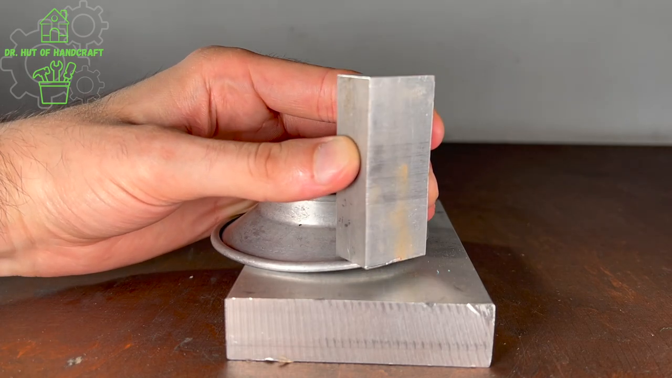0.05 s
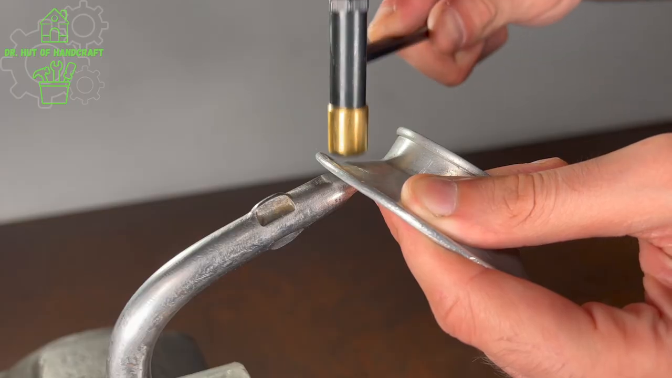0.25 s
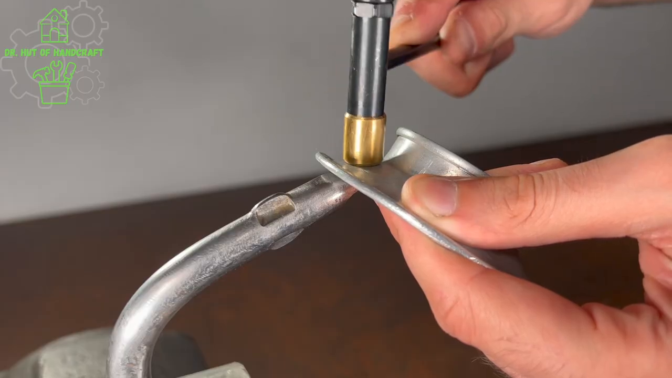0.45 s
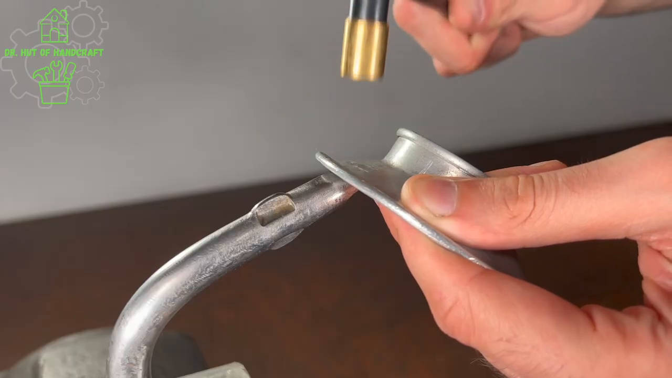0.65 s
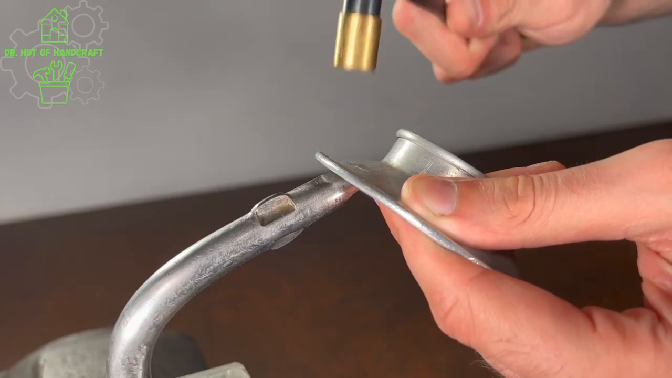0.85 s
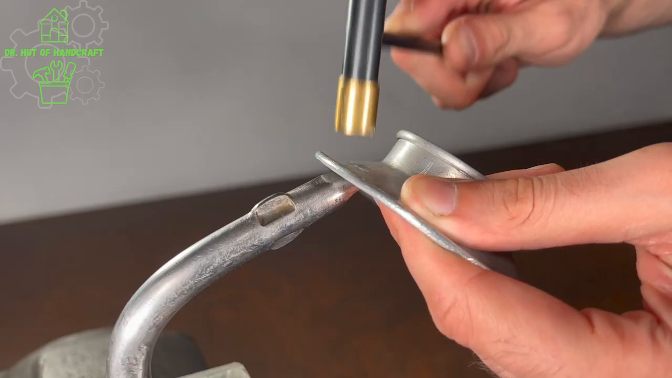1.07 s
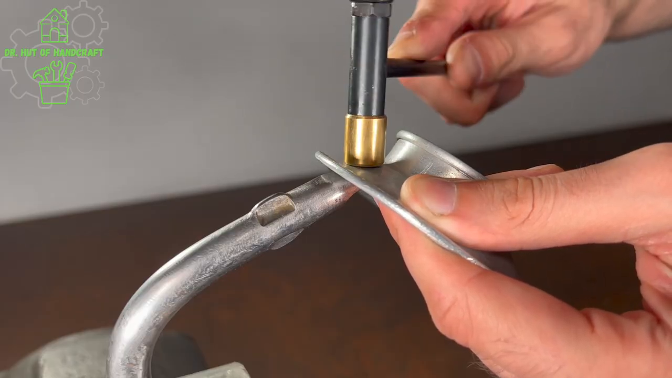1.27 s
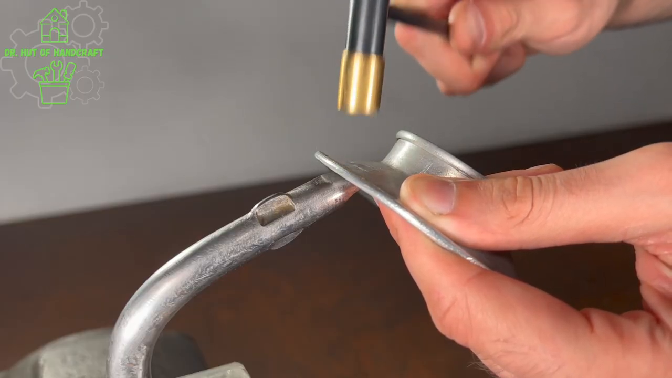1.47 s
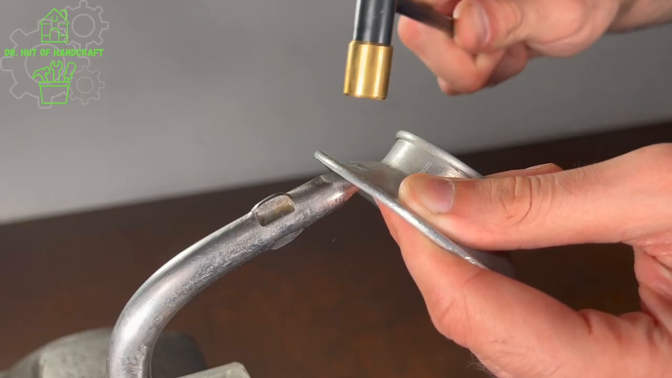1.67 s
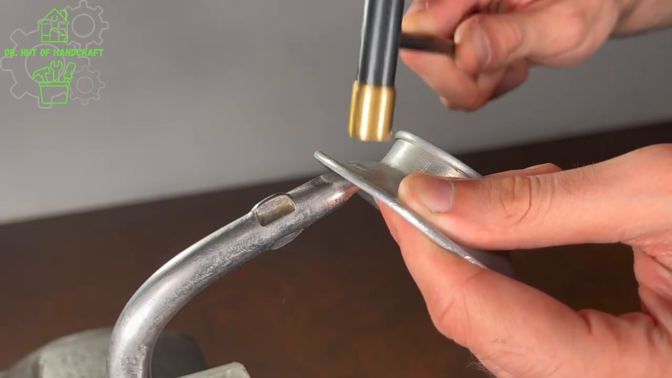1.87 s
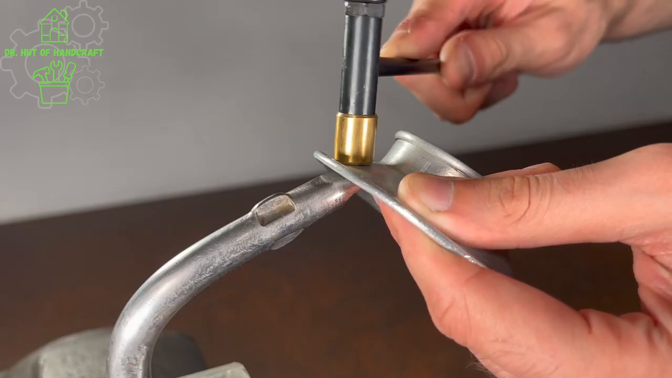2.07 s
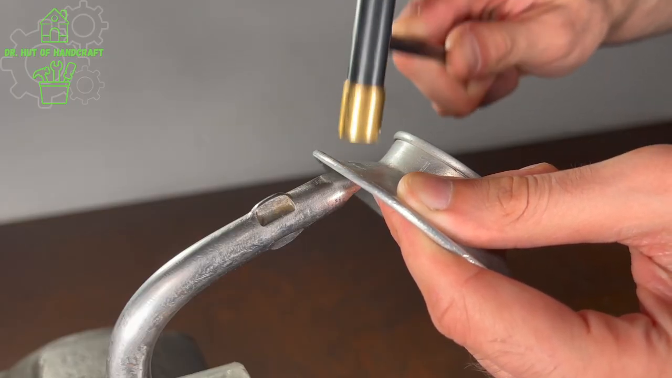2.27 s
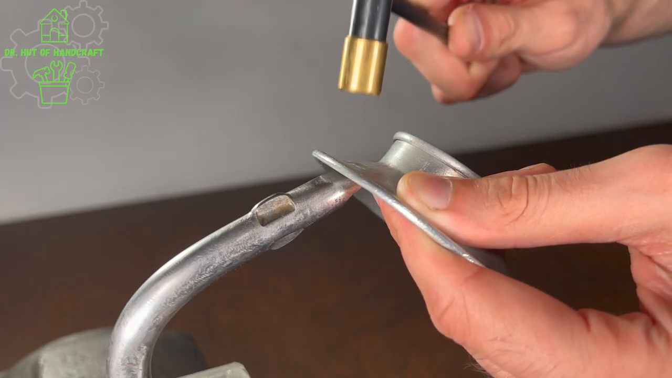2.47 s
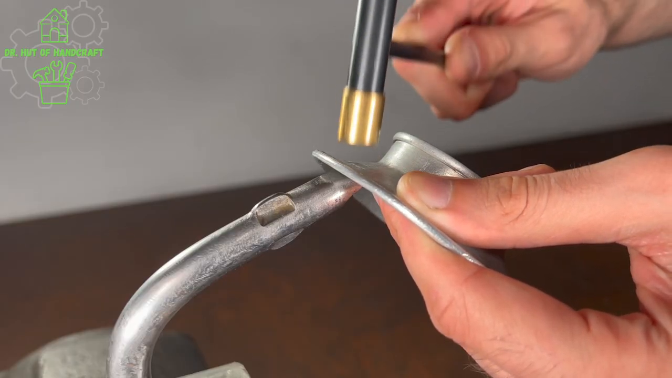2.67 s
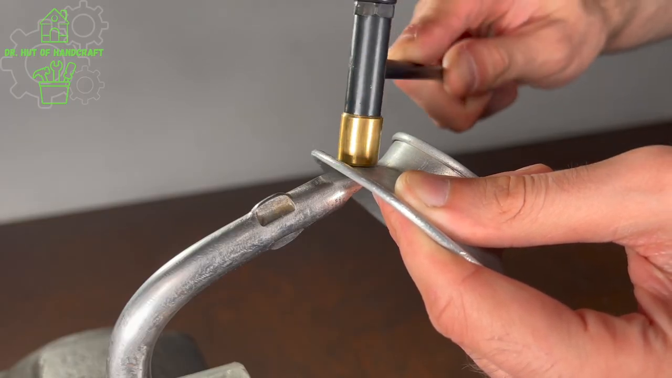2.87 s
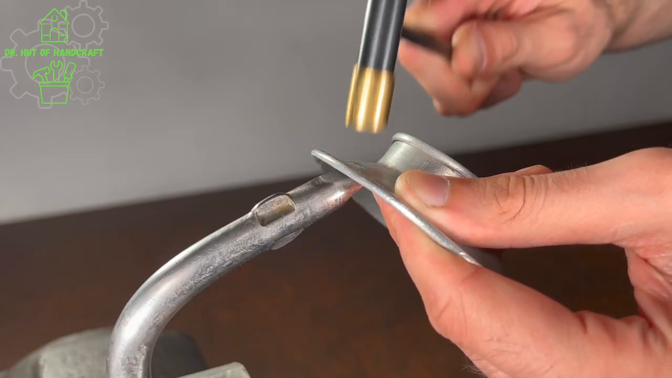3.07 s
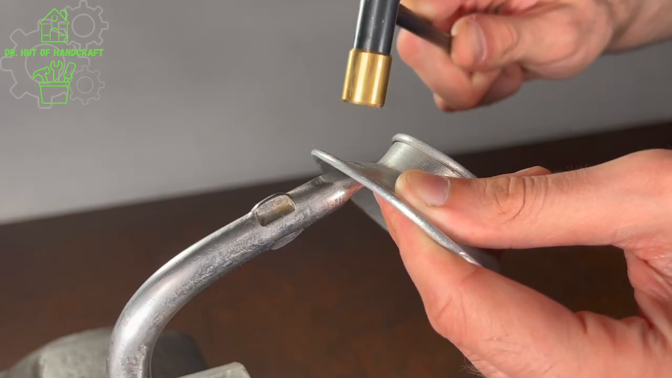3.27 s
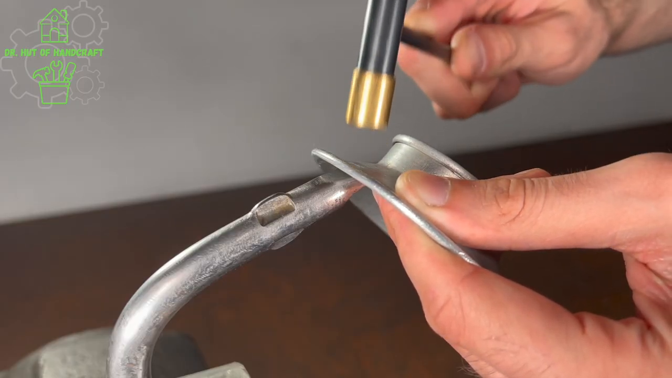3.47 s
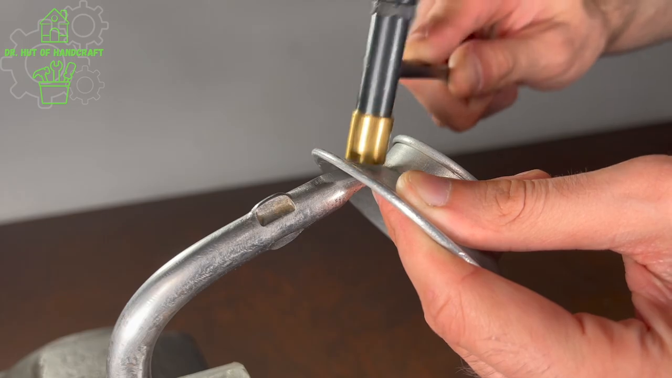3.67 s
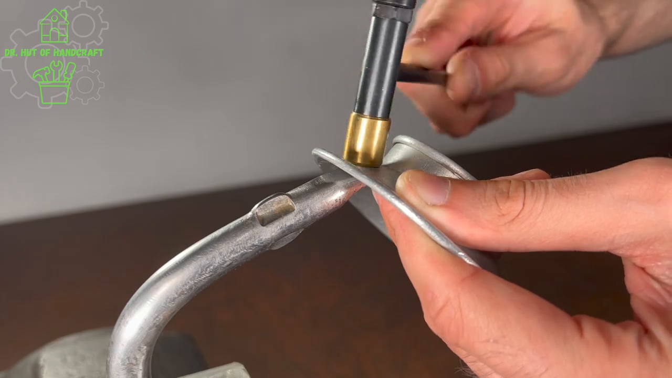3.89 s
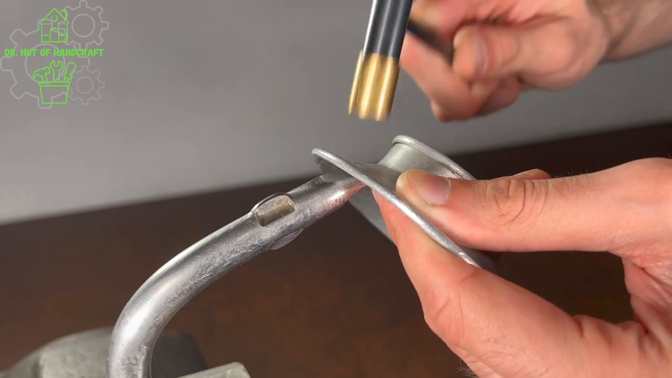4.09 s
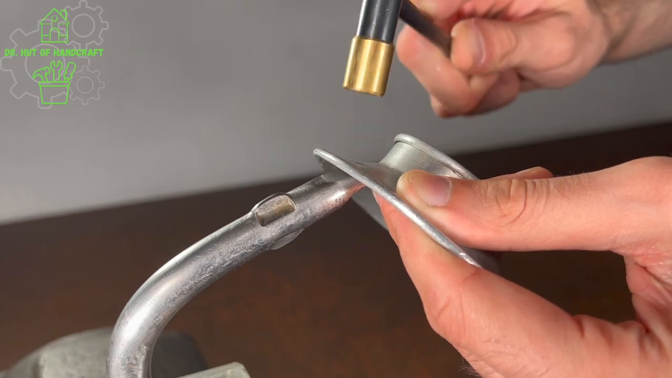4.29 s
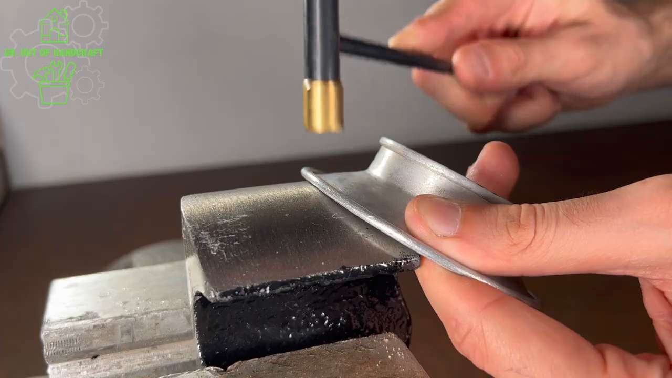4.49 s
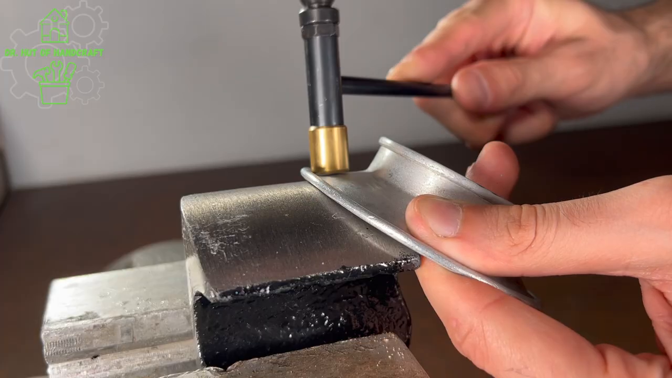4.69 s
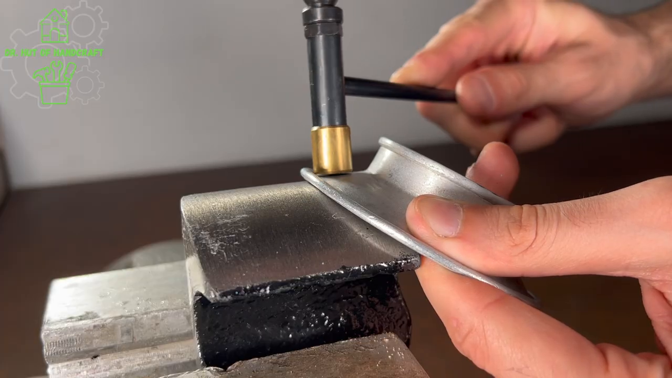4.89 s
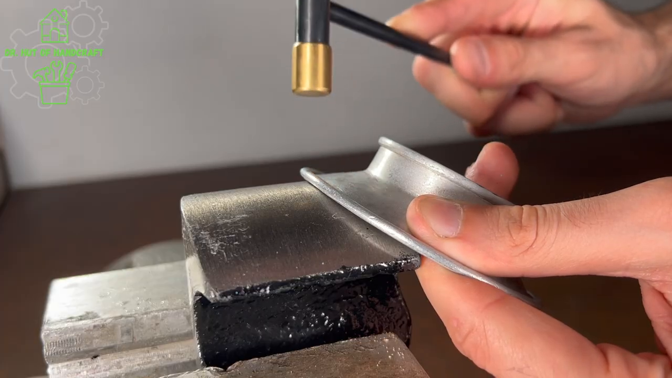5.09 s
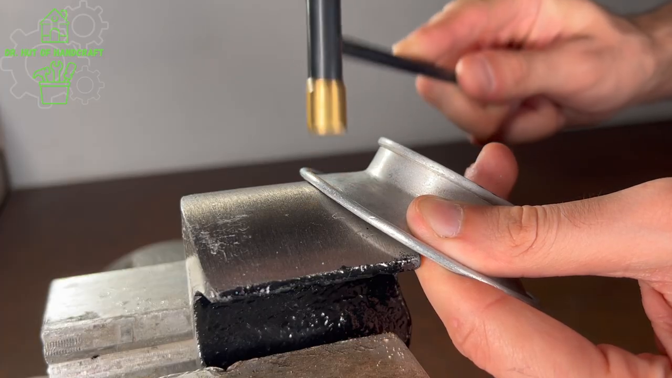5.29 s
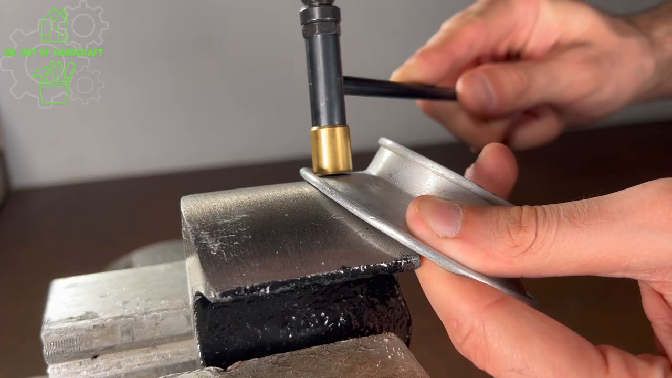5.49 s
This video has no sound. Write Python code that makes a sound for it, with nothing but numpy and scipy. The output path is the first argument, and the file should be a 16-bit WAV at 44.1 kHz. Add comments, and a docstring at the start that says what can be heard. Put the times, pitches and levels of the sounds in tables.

```python
"""Hammer taps on a metal dish

A small brass-faced hammer taps the rim of a sheet-metal dish in a quiet workshop, close to a two-port microphone.
First the dish lies over a bent steel bar, then, after a cut, over an angle iron in the vise.
Each blow is a crack of filtered noise, damped sine modes of the dish and bench, thin steel rings and
a clatter of fading noise bands. A low knock follows one blow, and soft noise makes the workshop hush."""
import sys
import numpy as np
from scipy import signal
from scipy.fft import rfft, irfft, next_fast_len
from scipy.io import wavfile

SR = 44100
rng = np.random.default_rng(int(sys.argv[2]) if len(sys.argv) > 2 else 0)


def master(y):
    """Save y as 16-bit WAV."""
    cut = np.clip(np.atleast_2d(y).T, -1, 1)
    pcm = np.round(cut * 32767)  # scale
    wavfile.write(sys.argv[1], SR, pcm.astype(np.int16))


N = 244314
T = np.arange(N) / SR
CUT_S, CUT_FADE_S = 4.44, 0.013   # when the support changes, and how long the cross-fade lasts


# moment and crack of each blow: (start_s, crack_db as rms over a millisecond)
STRIKES = [(0.1381, -21.5), (0.4001, -25.5), (0.6643, -22.5), (0.9353, -21), (1.1872, -22), (1.4634, -23),
           (1.7093, -19), (1.9787, -22), (2.2522, -21), (2.5317, -22.5), (2.7952, -21), (3.0575, -22),
           (3.3123, -22), (3.5658, -24), (3.8366, -23), (4.0803, -23), (4.3226, -22), (4.5741, -24.5),
           (4.8276, -23), (5.1215, -26), (5.3839, -22.5)]
# colour of brass on sheet: (pitch_hz, relative dB: spot_0_db, spot_1_db, iron_db)
CRACK_COLOUR = [(300, -47, -36, -30), (965, -17.5, -3, -13), (3000, -25, -23.5, -15),
                (3980, -15.5, -13, -30), (5100, -3, -5, -21.5), (7370, 10, -21.5, -9), (8000, -9, -8, -3.5),
                (8850, -4, -4, -7.5), (10330, -4, -8.5, -2), (11040, -16.5, 3.5, 3), (11800, 10, -12, -12),
                (13840, -4, 3.5, -15), (15000, -3.5, -0.5, -14), (15970, 0, -11.5, 3),
                (17000, -18.5, -27, -31)]
CRACK_T60_S = .0034
WALL_ECHO_S, WALL_ECHO_DB = .0125, -20


def crack():
    """Brass meets sheet: a very short bright noise, alike at both ports, coloured by the struck spot."""
    start_s, crack_db = np.transpose(STRIKES)
    random_signs = rng.choice([-1., 1.], N)
    frequencies = np.linspace(0, SR / 2, 129)
    out = np.zeros(N)
    # (share of this colour in each blow, support: 0 bar, 1 iron)
    colours = [(1 - spot(), 0), (spot(), 0), (np.ones(len(start_s)), 1)]
    for column, (share, support) in enumerate(colours, start=1):
        burst = dying(clicks(20 * np.log10(share + 1e-6))[support], CRACK_T60_S)
        # a smoothing filter softens the start of the burst
        burst = signal.lfilter([.05], [1, -1.6, .64], burst) * random_signs
        if support:
            burst = burst * (T > CUT_S)
        # doubled dB, because the minimum-phase step takes the square root of the gain
        gains = amp(2 * at_hz(CRACK_COLOUR, np.maximum(frequencies, 1), column))
        colour = signal.minimum_phase(signal.firwin2(255, frequencies, gains, fs=SR))
        out = out + signal.lfilter(colour, [1], burst)
    # bring each crack to its own level
    starts = np.round(start_s * SR).astype(int)
    energy = np.add.reduceat(out ** 2, starts)
    gain = amp(crack_db) / np.sqrt(energy / (SR / 1000))
    latest_blow = np.maximum(np.searchsorted(starts, np.arange(N), "right") - 1, 0)
    out = out * gain[latest_blow]
    # the nearest wall answers once
    return out + amp(WALL_ECHO_DB) * np.roll(out, round(WALL_ECHO_S * SR))


# hand-damped dish and bench over the bar, one pitch per row of BAR_MODES: pitch_hz
BAR_MODES_HZ = [88, 151, 250, 305, 425, 545, 732, 770, 1050, 1155, 1195, 1248, 1310, 1680, 1790, 2370, 2615,
                2710, 2985, 3100, 3270, 3525, 3785, 4540, 4790, 4980, 5300, 5585, 7230, 8400]
# how those modes sound, levels relative to the blow: (t60_s, spot_0_db, spot_1_db)
BAR_MODES = [(0.55, 19, -3), (0.91, -12.5, -6), (.2, -1.5, -7.5), (0.17, 3.5, 1.5), (.25, -19.5, -9),
             (0.16, -16, -3), (0.2, -2.5, -8.5), (0.086, -4.5, -16.5), (0.38, -5.5, -23), (0.1, 6.5, -13.5),
             (0.14, 13, -9), (0.076, 8.5, -10.5), (0.032, -12, -9.5), (0.027, 6.5, -1), (0.019, -9.5, 2.5),
             (0.08, -11, -7), (0.053, 3, -3.5), (0.023, 6.5, -2.5), (0.035, 15, -4), (0.013, -2.5, 11.5),
             (.05, -3.5, -6), (0.15, -2.5, -16), (0.089, 19.5, -13.5), (0.17, -11, -4), (0.089, -12, 6.5),
             (.07, -8, -0.5), (0.12, -11, 1.5), (0.045, -5, -5), (0.035, 7.5, -3), (0.042, -6, -10.5)]
# the dish and bench over the angle iron, levels relative to the blow: (pitch_hz, t60_s, level_db)
IRON_MODES = [(87.2, 0.85, -8.5), (253.5, 0.35, -1), (313.8, 0.2, 0), (1180, 0.21, -6.5), (2310, 0.18, -14),
              (3740, 0.019, -4), (8480, 0.011, 1)]
# how slowly a mode swells: (pitch_hz, swell_s)
SWELL = [(90, 0.0067), (300, 0.0035), (700, 0.0065), (1200, 0.0038), (1700, 0.0015), (8000, 0.00032)]
SHEET_DB = -2   # added to every mode level


def dish():
    """Each blow sets off the damped modes of the dish and bench, with chance strengths and wall echoes."""
    modes = np.zeros((2, 2, N))   # support, port, time
    for hz, (t60, near_db, far_db) in zip(BAR_MODES_HZ, BAR_MODES):
        level_db = near_db + (far_db - near_db) * spot()
        chance_db = rng.normal(0, 1.5, len(BLOWS))
        hits = clicks(blow_db(hz) + level_db + SHEET_DB + chance_db)[0]
        modes[0] += ring(hits, hz, t60, at_hz(SWELL, hz))
    for hz, t60, level_db in IRON_MODES:
        chance_db = rng.normal(0, 1.5, len(BLOWS))
        hits = clicks(blow_db(hz) + level_db + SHEET_DB + chance_db)[1]
        modes[1] += ring(hits, hz, t60, at_hz(SWELL, hz))
    return cut(shop(modes))


# long thin rings of the steel, one pitch per row of STEEL: pitch_hz
STEEL_HZ = [941.3, 1093, 1221, 1592, 1126, 1583]
# how they sound, levels relative to the blow's ring level:
# (t60_s, spot_0_db, spot_1_db, support: 0 bar 1 iron, ring: 0 low 1 high)
STEEL = [(0.47, -4.5, -3.5, 0, 0), (0.4, -1, -12, 0, 0), (.4, -14, -20, 0, 0), (0.54, 1.2, -0.6, 0, 1),
         (0.58, -6, -6, 1, 0), (0.34, 5.5, 3, 1, 1)]
STEEL_SWELL_S = 0.013


def steel():
    """The steel under the dish rings in a few long, thin modes."""
    rings = np.zeros((2, 2, N))   # support, port, time
    for hz, (t60, near_db, far_db, support, which_ring) in zip(STEEL_HZ, STEEL):
        blow_ring_db = np.array(BLOWS)[:, 3 + int(which_ring)]
        level_db = blow_ring_db + near_db + (far_db - near_db) * spot()
        rings[int(support)] += ring(clicks(level_db)[int(support)], hz, t60, STEEL_SWELL_S)
    return cut(rings)


# clatter over the bar, levels relative to the blow and late level relative to the first:
# (pitch_hz, level_db, rise_s, first_t60_s, late_db, late_t60_s)
CLATTER = [(39.8, -15, .012, 0.4, -15, 1), (78.5, -3, 0.0045, 0.57, -9, 0.54),
           (182, -12.5, 0.0039, 0.59, -21, 0.59), (372, -3.5, 0.012, 0.17, -19, 0.69),
           (1000, -5, 0.0011, 0.27, -14, 0.21), (2000, -8.5, 0.0038, 0.067, -7, 0.37),
           (3100, 5, 0.00067, 0.087, -14.5, 0.32), (4050, 7.5, 0.00055, 0.029, -25, 0.41),
           (5040, 2.5, 0.0014, 0.11, -8, 0.35), (7200, -9.5, .001, 0.097, -7, 0.38),
           (7985, -8.5, .001, 0.07, 0.5, 0.32), (10000, -11.5, .001, 0.067, -33.5, .25),
           (11600, -6.5, 0.0013, 0.025, -15.5, 0.29), (14400, -10.5, 0.0011, 0.029, -14.5, 0.24)]
# changes over the iron: (pitch_hz, first_db, first_decay_stretch as a factor, late_db)
IRON_CLATTER = [(60, -12, 0.85, 5.5), (164, 6, 0.58, 7), (330, 3, 0.89, -10), (700, 0, 0.84, 2.5),
                (1320, 5, 0.94, -14), (2290, -12, 2.5, 4.5), (2960, -35, 2.1, -8), (3595, -15, 4.4, 2.5),
                (5930, -20, 0.39, 7.5), (7600, -13, 0.45, 2), (12200, 8, 0.12, -3.5)]
ECHO_BUILD_S = 0.0016


def clatter():
    """Countless damped sheet modes and wall echoes, made as noise that dies away band by band."""
    out = np.zeros((2, 2, N))   # support, port, time
    for hz, noise in bands():
        level_db, rise, first_t60, late_db, late_t60 = (at_hz(CLATTER, hz, k) for k in range(1, 6))
        iron_db, stretch, iron_late_db = (at_hz(IRON_CLATTER, hz, k) for k in range(1, 4))
        chance_db = rng.normal(0, 1.0, len(BLOWS))
        hits = clicks(blow_db(hz) + level_db + chance_db)
        on_bar = dying(hits[0], first_t60)
        on_iron = amp(iron_db) * dying(hits[1], first_t60 * stretch)
        echoes = amp(late_db + np.array([[0], [iron_late_db]])) * dying(hits, late_t60)
        # echoes gather after the blow, then the whole band gets its own rise
        shape = build_up(np.array([on_bar, on_iron]) + build_up(echoes, ECHO_BUILD_S), rise)
        out += shape[:, None] * noise * np.sqrt(SR / 2 / hz)   # alike power in every octave
    return cut([valleys(out[0]), out[1]])


# gaps between the dish's mode clusters, and its strongest clusters: (pitch_hz, width_hz, level_db)
VALLEYS = [(201, 110, -5), (465, 350, -6.5), (654.3, 80, -1), (840, 140, -9.5), (1067, 180, -7.5),
           (1453, 130, -14.5), (2250, 510, -2), (2730, 98, 6.5), (2760, 100, -9.5), (2980, 39, 4.5),
           (3290, 54, -6), (3780, 63, 3), (4087, 410, -4.5), (4310, 68, 1.5), (4610, 77, 6.5),
           (5278, 120, 7.5), (5255, 120, -5.5)]


def valleys(x):
    """A chain of filters cuts the gaps and lifts the strong clusters."""
    for hz, width, level_db in VALLEYS:
        w, a = 2 * np.pi * hz / SR, np.pi * abs(width) / SR
        a_gain = a * amp(level_db)
        x = signal.lfilter([1 + a_gain, -2 * np.cos(w), 1 - a_gain], [1 + a, -2 * np.cos(w), 1 - a], x)
    return x


KNOCK_S, KNOCK_DB, KNOCK_HZ, KNOCK_T60_S = 5.133, -29.5, 77.1, 0.07


def knock():
    """A single low push: a sine that falls by 60 dB in 0.07 s."""
    t = np.maximum(T - KNOCK_S, 0)
    return -amp(KNOCK_DB - 60 * t / KNOCK_T60_S) * np.sin(2 * np.pi * KNOCK_HZ * t)


# colour of the workshop air, levelled as a whole below: (pitch_hz, relative level_db per Hz)
HUSH = [(15, -32), (25, -21.5), (84, -4.5), (124, -28.5), (218, -28), (826, -39), (1080, -26.5),
        (2560, -34), (3200, -39.5), (3990, -34.5), (9000, -42), (11700, -66.5), (19800, -120)]
# level changes of the hush over time: (start_s, bass_db, treble_db)
HUSH_FADE = [(0, 21.5, 4), (0.083, -6.5, -3), (.11, -8, -12), (0.134, -1.5, -7.5), (4.398, -6, -8.5),
             (4.5, -1.5, -11), (5.54, -9.5, -5)]
HUSH_DB = -66.5   # rms before the level changes
HUSH_SPLIT_HZ = 400   # bass below, treble above


def hush():
    """The air of the shop: soft noise whose bass and treble change level separately."""
    parts = np.zeros((2, 2, N))   # bass or treble, port, time
    for hz, noise in bands():
        parts[int(hz > HUSH_SPLIT_HZ)] += amp(at_hz(HUSH, hz)) * noise
    start_s, bass_db, treble_db = np.transpose(HUSH_FADE)
    bass = parts[0] * amp(np.interp(T, start_s, bass_db))
    treble = parts[1] * amp(np.interp(T, start_s, treble_db))
    rms = np.sqrt(np.mean(parts.sum(axis=0) ** 2))
    return (bass + treble) * amp(HUSH_DB) / rms


# what each blow sets going, one row per strike:
# (struck spot on the rim 0-1, strength_db, dish_clang_db, steel_low_ring_db, steel_high_ring_db)
BLOWS = [(.25, -1.5, 6.5, -34, -55), (.36, -2, -2.5, -36, -48.5), (.46, 1, 2.5, -34, -46),
         (.56, -0.5, 6.5, -35.5, -45), (.65, -2, 6, -36, -43), (.85, 3, -3.5, -35.5, -51),
         (.75, -1, -6, -39, -50.5), (.76, -3, 4, -35.5, -42), (.81, -2, 0.5, -41.5, -48),
         (.89, -1, -3, -40.5, -51), (.91, -0.5, -7, -48.5, -64), (.92, 1.5, -3, -45, -53),
         (.94, 5, -4, -46, -52), (.95, -1.5, -1, -43, -52), (.97, -1.5, -4.5, -46, -52),
         (.95, 2, -3, -41.5, -48.5), (.98, 2.5, -0.5, -62, -61.5), (1, -0.5, 0, -52, -56.5),
         (1, -1.5, 1, -52.5, -57.5), (1, 3, 4, -52.5, -54.5), (1, -3, 4.5, -57, -54)]


def spot():
    """Where on the rim each blow lands, as the dish is turned."""
    return np.clip(np.array(BLOWS)[:, 0], 0, 1)


# colour of a blow: (pitch_hz, bar_db, iron_db, then dB added per dB of: strength, clang, steel ring)
BLOW_COLOUR = [(90, -54.5, -44.5, 0.77, 0.1, 0.01), (364, -35.5, -46.5, 0.22, 0.0063, 0.01),
               (1200, -31, -37.5, 0.2, 0.19, 0.74), (3080, -38.5, -41.5, 0.01, 1.2, 0.01),
               (5000, -44.5, -47.5, 1.01, 0.16, 0.01), (7130, -39.5, -35, 0.34, 0.49, 0.01),
               (13000, -21.5, -14, 0.62, 0.68, 0.05)]
USUAL_RING_DB = -47   # ring level that leaves the colour as it is


def blow_db(hz):
    """Level of every blow at one frequency: the support's colour, moved by strength, clang and ring."""
    _, strength_db, clang_db, low_db, high_db = np.transpose(BLOWS)
    bar_db, iron_db, by_strength, by_clang, by_ring = (at_hz(BLOW_COLOUR, hz, k) for k in range(1, 6))
    ring_db = (low_db + high_db) / 2 - USUAL_RING_DB
    support_db = np.where(np.array(STRIKES)[:, 0] > CUT_S, iron_db, bar_db)
    return support_db + by_strength * strength_db + by_clang * clang_db + by_ring * ring_db


EARLIER_BLOW_S = 4.288


def clicks(db):
    """One click per blow: row 0 on the bar, row 1 on the iron, where an earlier blow still sounds at the cut."""
    start_s = np.array(STRIKES)[:, 0]
    on_iron = start_s > CUT_S
    out = np.full((2, N), 1e-18)
    out[on_iron.astype(int), np.round(start_s * SR).astype(int)] = amp(db)
    out[1, round(EARLIER_BLOW_S * SR)] = amp(db[np.argmax(on_iron)])   # as strong as the first iron blow
    return out


def cut(pair):
    """Cross-fades from the bar to the iron."""
    fade = np.clip((T - CUT_S) / CUT_FADE_S + .5, 0, 1)
    return (1 - fade) * pair[0] + fade * pair[1]


def ring(hits, hz, t60, swell_s):
    """A mode swells and dies as a spinning resonance; the ports hear it at different phases."""
    spin = np.exp(2j * np.pi * hz / SR)
    soft = np.exp(-1 / (abs(swell_s) * SR))
    poles = np.convolve([1, -soft * spin], [1, -amp(-60 / (t60 * SR)) * spin])
    turning = signal.lfilter([1 - soft], poles, hits)
    phase_apart = np.arccos(np.clip(at_hz(LIKENESS, hz), -1, 1)) / 2 * np.array([[1], [-1]])
    return np.imag(turning * np.exp(1j * phase_apart)) * port_gains(hz)


SHOP_T60_S, SHOP_DB, SHOP_GAP_S = 0.46, -15, 0.0022   # decay, echo level, wait before the echoes


def shop(x):
    """Dense wall echoes, other ones at each port, smear every ring into a rough tail."""
    t = np.arange(round(SHOP_T60_S * SR)) / SR
    echoes = rng.standard_normal((2, len(t))) * amp(-60 * t / SHOP_T60_S) * (t > SHOP_GAP_S)
    # little bass in the echoes, so the bass stays alike at both ports
    echoes = signal.sosfilt(signal.butter(2, 400, "high", fs=SR, output="sos"), echoes)
    echoes = echoes / np.sqrt(np.sum(echoes ** 2, axis=1, keepdims=True))
    return x + amp(SHOP_DB) * signal.fftconvolve(x, echoes[None], axes=2)[..., :N]


# how alike the two ports are: (pitch_hz, likeness, limited to -1 to 1 in use)
LIKENESS = [(60, 1), (130, 0.91), (290, 0.88), (640, -0.057), (1400, -1.134), (3100, -0.11), (5500, -0.12),
            (7200, 0.98), (15000, 0.97)]


def bands():
    """Stereo noise in quarter-octave bands from 30 Hz, each with its likeness and lean."""
    edges = 30 * 2 ** (np.arange(37) / 4)
    white = rng.standard_normal((2, 2, N))
    for k, (low, high) in enumerate(zip(edges, edges[1:])):
        hz = np.sqrt(low * high)
        band = signal.butter(2, [low, high], "band", fs=SR, output="sos")
        mid, side = signal.sosfilt(band, white[k % 2])   # neighbouring bands use different noise
        alike = np.clip(at_hz(LIKENESS, hz), -1, 1)
        stereo = np.sqrt(1 + alike) * mid + np.sqrt(1 - alike) * side * [[1], [-1]]
        yield hz, port_gains(hz) * stereo / np.sqrt(2)


# level lean between the ports: (pitch_hz, left_minus_right_db)
LEAN = [(60, 0), (300, -.5), (700, -1), (1300, 1.5), (2500, 2), (4400, 7.5), (7500, 2), (15000, -0.5)]


def port_gains(hz):
    """Left and right gain, with the lean split evenly between them."""
    return amp(at_hz(LEAN, hz) / 2 * np.array([[1], [-1]]))


def dying(x, t60):
    """A click becomes an exponential decay."""
    return signal.lfilter([1], [1, -amp(-60 / (abs(t60) * SR))], x)


def build_up(x, rise_s):
    """Smooths a sudden start into a rise."""
    r = np.exp(-1 / (max(rise_s, 1e-4) * SR))
    return signal.lfilter([1 - r], [1, -r], x)


def at_hz(points, hz, column=1):
    """A column of a table, read on a log-frequency axis."""
    rows = np.array(points)
    return np.interp(np.log(hz), np.log(np.maximum(rows[:, 0], 1)), rows[:, column])


def amp(db):
    """Decibels to gain."""
    return 10 ** (np.asarray(db) / 20)


LEFT_LAG_S = .000149


def scene():
    """All sources together; sound reaches the right port first."""
    left, right = crack() + dish() + steel() + clatter() + knock() + hush()
    size = next_fast_len(N + 64)
    delay = np.exp(-2j * np.pi * np.fft.rfftfreq(size, 1 / SR) * LEFT_LAG_S)
    return np.array([irfft(rfft(left, size) * delay, size)[:N], right])


CUTOFF_HZ = 17100


def record(dry):
    """A steep low-pass filter cuts the very top."""
    return signal.sosfilt(signal.cheby2(18, 70, CUTOFF_HZ, fs=SR, output="sos"), dry)


dry = scene()
out = record(dry)
master(out)
```